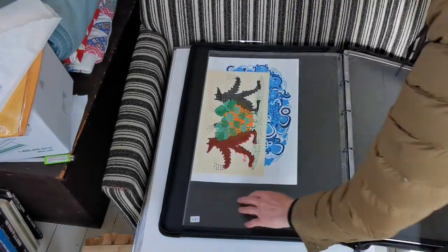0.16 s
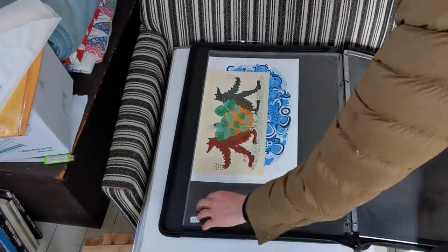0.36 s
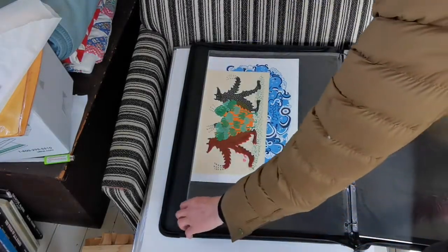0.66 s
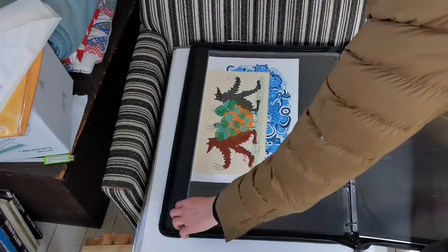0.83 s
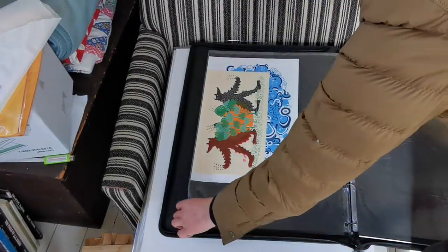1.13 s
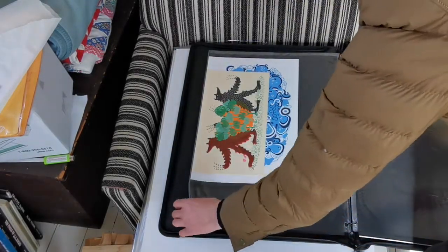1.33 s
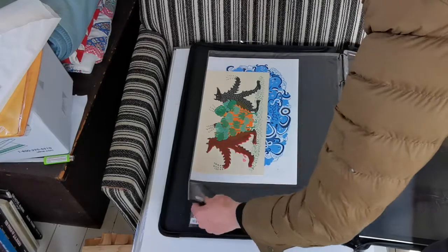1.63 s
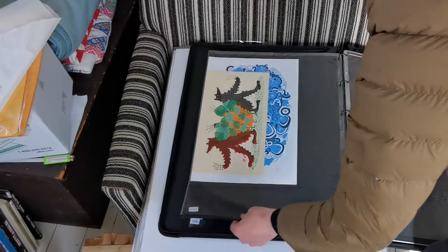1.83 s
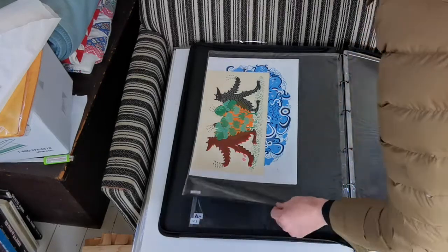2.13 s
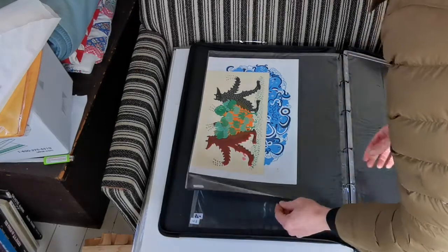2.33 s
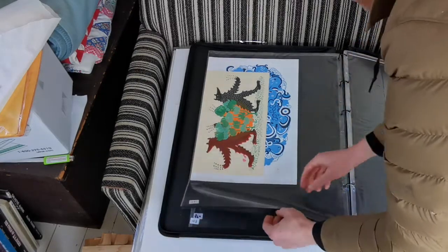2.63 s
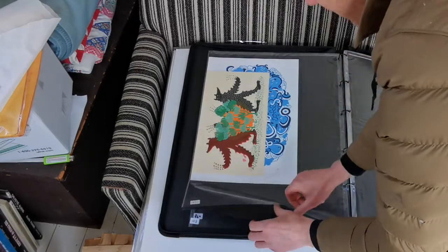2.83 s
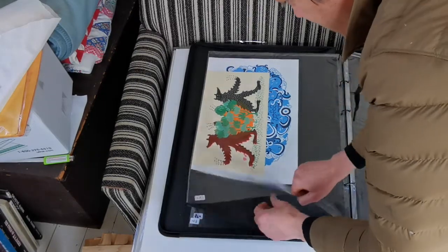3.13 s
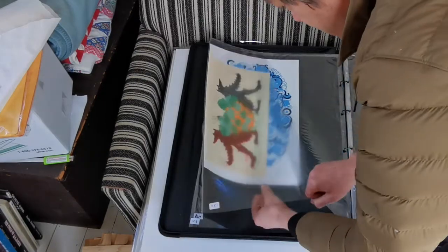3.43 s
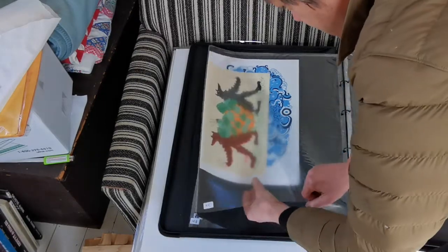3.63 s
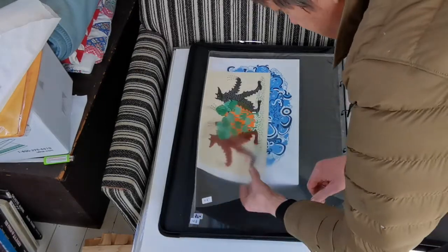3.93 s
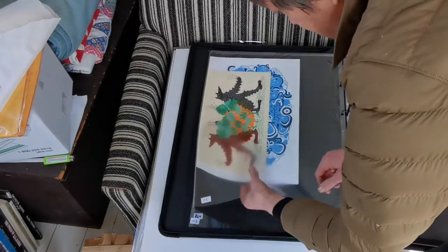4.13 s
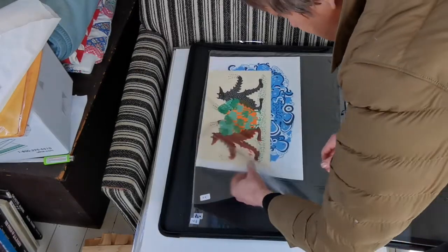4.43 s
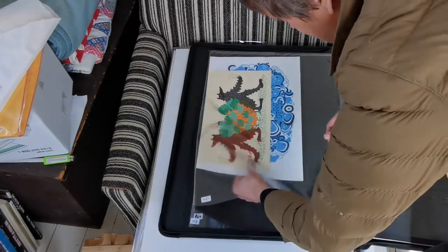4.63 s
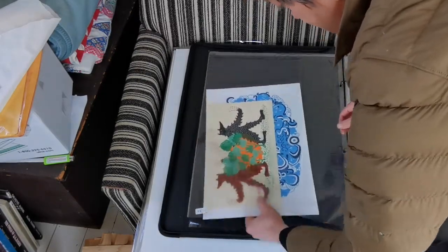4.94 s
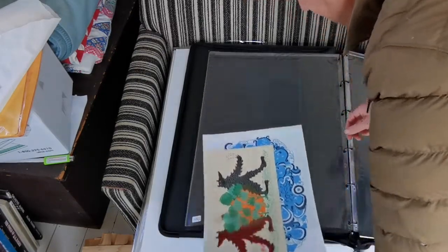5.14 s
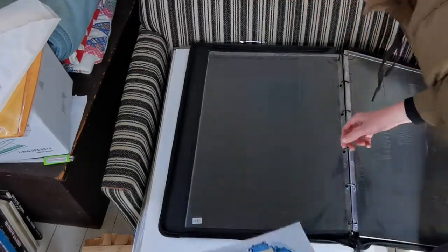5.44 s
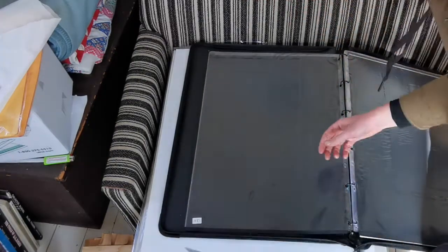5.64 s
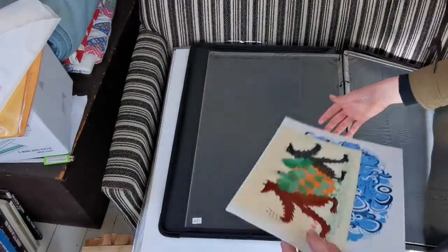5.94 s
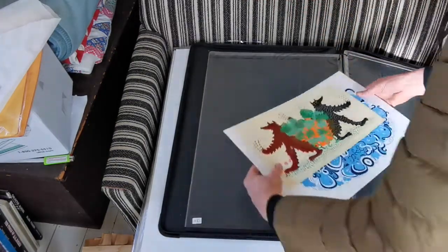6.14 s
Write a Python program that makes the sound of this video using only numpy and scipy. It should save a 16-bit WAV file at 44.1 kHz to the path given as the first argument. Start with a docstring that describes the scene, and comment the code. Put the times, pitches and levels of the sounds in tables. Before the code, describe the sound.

Close in a small furnished room, fingers and a jacket sleeve rub faintly over plastic film. Small crinkles and clicks build, then the stiff sleeve pops in a rapid burst of loud, bright clacks with a dull wobble and a brief binder ring. After lighter flaps and a lull, a print is drawn out with a steady hiss that drops in a quick swoop, leaving faint paper handling.

```python
"""Plastic sleeves and paper prints in a binder

A hand in a padded jacket picks at a clear plastic sleeve in a large binder in a small furnished room.
Its film buckles with sharp clacks (struck resonances) and wobbles (clumped noise); binder modes ring along.
Prints are drawn out with a hiss (coloured friction noise) that ends in a falling swoop (a gliding band-pass).
Synthetic echoes and still-room noise surround it all.
"""
import sys
import numpy as np
from scipy import signal
from scipy.fft import rfft, irfft, next_fast_len
from scipy.io import wavfile

SR = 44100
rng = np.random.default_rng(int(sys.argv[2]) if len(sys.argv) > 2 else 0)


def dump_mix(stems):
    """Bounce the given channels to the path in sys.argv[1] as a 16-bit WAV at rate SR."""
    frames = np.atleast_2d(stems).T  # one column per channel
    limited = np.clip(frames, -1, 1)  # hard clip at full scale
    pcm = np.round(limited * 32767).astype(np.int16)
    wavfile.write(sys.argv[1], SR, pcm)


N = 276948
TIME = np.arange(N) / SR

# dents in the film popping through: start_s [s], level_db [relative dB], pitch_hz [Hz], width_hz [Hz]
CLACK_EVENTS = [(0.8813, -30.5, 3470, 1990), (1.4226, -44, 1390, 615), (2.1124, -30.5, 3070, 5850),
                (2.1571, -30, 4750, 7000), (2.248, -24.5, 2760, 1310), (2.255, -25.5, 1220, 695),
                (3.168, -9.5, 2080, 2340), (3.181, -12.5, 5540, 5940), (3.189, -11.5, 2330, 2900),
                (3.2002, -16.5, 4450, 5000), (3.216, -12.5, 3040, 3300), (3.3183, -36, 1400, 1500),
                (3.3587, -28.5, 1670, 1870), (3.458, -27, 2270, 1400), (3.494, -25.5, 835, 470),
                (4.3499, -37.5, 825, 1200), (5.0097, -19.5, 3290, 1560), (5.649, -36.5, 304, 352),
                (6.1868, -43, 750, 700)]
# loose sheets slapping and fluttering on: start_s [s], level_db [relative dB], pitch_hz [Hz], width_hz [Hz]
FLAP_EVENTS = [(0.044, -49, 446, 900), (2.2485, -25.5, 920, 830), (2.258, -30.5, 1210, 890),
               (3.072, -33, 810, 910), (3.0736, -32.5, 1880, 448), (3.1854, -20.5, 980, 1500),
               (3.2305, -20, 1090, 1600), (3.3565, -31.5, 530, 500), (3.497, -37, 2750, 800),
               (3.648, -49.5, 690, 715), (3.7105, -29.5, 1490, 1910), (3.781, -25, 1110, 3620),
               (3.824, -38, 434, 800), (4.804, -34.5, 846, 1020), (5.0104, -31, 725, 567),
               (6.2445, -40, 1380, 2530)]
# dull bumps of the arm and of paper dropping free:
# start_s [s], level_db [relative dB], pitch_hz [Hz], width_hz [Hz]
BUMP_EVENTS = [(0.248, -49, 70, 71), (5.649, -45, 318, 150), (5.759, -56, 158, 60)]


def snaps(stop_cycles=1.5, stop_share=0.42, flutter_s=0.015, skirt=2.97, softness=1.25,
          thud_db=-19, thud_hz=520, crackle_db=4, count=4):
    """Snap-through buckling: a dent pops, stops and crackles on; one row for each place on the sheet."""
    out = np.zeros((count, N))
    t = TIME[:SR // 6]
    # each kind with the relative level of its after-crackle, dB
    kinds = (CLACK_EVENTS, -15), (FLAP_EVENTS, -9), (BUMP_EVENTS, -35)
    events = [(*row, flutter_db) for rows, flutter_db in kinds for row in rows]
    for k, (start_s, level_db, pitch_hz, width_hz, flutter_db) in enumerate(events):
        push = np.zeros(len(t))
        push[0] = 1
        stop_s = min(stop_cycles / pitch_hz, .02)
        push[int(stop_s * SR)] -= stop_share
        grains = from_db(crackle_db * drift(610, size=len(t)))
        crackle = rms_one(rng.standard_normal(len(t)) * grains)
        push += from_db(flutter_db) * np.sqrt(width_hz / SR) * crackle * np.exp(-t / flutter_s)
        pop = signal.lfilter(*resonance(pitch_hz, width_hz), push)
        pop = signal.lfilter(*resonance(pitch_hz, skirt * (pitch_hz + width_hz)), pop)
        # the whole sheet recoils
        thud = signal.lfilter(*resonance(min(pitch_hz, thud_hz), min(pitch_hz, 700)), push)
        snap = pop / np.abs(pop).max() + from_db(thud_db) * thud / np.abs(thud).max()
        # a narrow, low resonance is given little treble
        edge_hz = min(softness * (pitch_hz + width_hz), .4 * SR)
        snap = signal.lfilter(*signal.butter(2, edge_hz, fs=SR), snap)
        add(out[k % count], start_s, from_db(level_db) * snap)
    return out


# modes of the binder and its stack of sleeves: pitch_hz [Hz], width_hz [Hz], level_db [relative dB]
BINDER_MODES = [(137, 3.7, 3.5), (202.4, 5.5, 8), (243.6, 7.9, 9.5), (636, 18, 13), (793, 18, 7),
                (961, 26, 5), (1056, 6.7, 12), (1185, 52, 9), (1240, 27, -3), (2550, 300, -5),
                (3250, 70, -33)]


def binder(x, ring_db=-2):
    """Modal excitation: the moving film drives the binder's resonances."""
    driven = x + 1e-18   # tiny offset keeps the filters from slowing on vanishing numbers
    return sum(from_db(level_db + ring_db) * signal.lfilter(*resonance(pitch_hz, width_hz), driven)
               for pitch_hz, width_hz, level_db in BINDER_MODES)


def long_pull():
    """Sliding friction: as less paper is left, hiss and scrape strengths fade, and drone dies first."""
    start_s, rise_s, hold_s, release_s = 4.79, 0.048, 0.73, 0.22
    t = np.maximum(TIME - start_s, 0)
    hiss_db = -45.5 - 5 * t   # relative level and sag in dB per second
    scrape_db = -47.5 - 7.5 * t
    drone_db = -53.5 - 17 * t
    return from_db([hiss_db, scrape_db, drone_db]) * swell(start_s, rise_s, hold_s, release_s)


# hand and jacket sliding over the sleeve: start_s [s], rise_s [s], hold_s [s], release_s [s],
# hiss_db, scrape_db, drone_db [relative dB]
HAND_SLIDES = [(0.03, .25, 0.057, .4, -59.5, -59, -63.5), (0.72, 0.0071, 0.017, 0.11, -62, -69, -82),
               (0.82, 0.013, 0.021, 0.044, -70, -64.5, -64.5), (0.88, .005, 0.017, 0.034, -47, -51.5, -81),
               (1.02, 0.032, 0.018, 0.2, -59, -53, -61.5), (1.15, .04, 0.019, 0.04, -57.5, -57.5, -61.5),
               (1.40, 0.019, .16, 0.36, -61, -60.5, -65), (1.66, 0.2, 0.17, 0.75, -54.5, -57.5, -61.5),
               (2.2, 0.2, 0.22, 0.17, -59.5, -57, -57), (2.71, 0.031, 0.018, 0.076, -44.5, -44, -48.5),
               (2.85, .14, 0.018, 0.085, -62.5, -62, -53)]
# prints nudged inside the sleeve, later carried: start_s [s], rise_s [s], hold_s [s], release_s [s],
# hiss_db, scrape_db, drone_db [relative dB]
PRINT_NUDGES = [(3.86, 0.034, 0.15, 0.086, -84, -80, -67), (4.17, .015, 0.22, .1, -69, -70, -68.5),
                (4.3, .12, 0.025, 0.44, -57, -55, -53), (4.52, 0.11, 0.046, 0.059, -58.5, -58, -49),
                (5.87, 0.23, .08, .1, -71, -75.5, -66.5), (6.1, 0.11, 0.058, .1, -62.5, -60, -63)]


def slides(rows):
    """Kinematic friction: hiss, scrape and drone strengths all follow the speed; powers add."""
    power = 0
    for *timing, hiss_db, scrape_db, drone_db in rows:
        strength = from_db([hiss_db, scrape_db, drone_db])[:, None]
        power = power + (strength * swell(*timing)) ** 2
    return np.sqrt(power)


# spectrum of the fine hiss: frequency_hz [Hz], level_db [relative dB]
HISS_COLOUR = [(2000, -28), (3800, -24), (5500, 2), (7000, 2.5), (9000, -4.5), (15000, -3)]
# spectrum of the coarse scrape: frequency_hz [Hz], level_db [relative dB]
SCRAPE_COLOUR = [(800, -38), (1500, -10), (2300, -3.5), (3400, -1.5), (4800, -4.5), (8000, -13)]
# spectrum of the sheet drone: frequency_hz [Hz], level_db [relative dB]
DRONE_COLOUR = [(100, -14), (250, -12), (450, -5), (750, -2), (1200, -0.5), (1800, -5), (3500, -22.5)]


def rubbing(strengths, hiss_db, scrape_db, drone_db, grain_db):
    """Friction noise: sliding surfaces hiss, scrape and set the broad sheets droning."""
    out = 0
    colours = HISS_COLOUR, SCRAPE_COLOUR, DRONE_COLOUR
    for colour, strength, trim_db in zip(colours, strengths, (hiss_db, scrape_db, drone_db)):
        waver_db = 1.02 * drift(25)   # sliding is never quite even
        out = out + strength * from_db(trim_db + waver_db) * coloured(friction(grain_db), colour)
    return out


# air through the gap, a thin stream, then the rush as the paper leaves:
# start_s [s], rise_s [s], hold_s [s], release_s [s], level_db [relative dB]
AIR_FLOWS = [(5.215, 0.066, .3, .08, -57), (5.5, 0.052, .1, 0.11, -48)]


def swoop(width_share=0.3, level_db=-1.5, lowest_hz=210, rough_db=1.6, flutters_per_s=120, size=64):
    """Cavity resonance: the gap sings at one pitch, then falls ever faster to a floor as it widens."""
    gap_hz, opens_s, fall_octaves_per_s2 = 2520, 5.41, 41
    fall_octaves = fall_octaves_per_s2 * np.maximum(TIME - opens_s, 0) ** 2
    hz = np.maximum(gap_hz * 2 ** -fall_octaves, lowest_hz)
    flow = np.max([from_db(db) * swell(*timing) for *timing, db in AIR_FLOWS], axis=0)
    slips = rms_one(friction(rough_db, flutters_per_s)[0])
    out, state = np.zeros(N), np.zeros(2)
    # retune every block, carrying the filter state over
    for i in range(int(AIR_FLOWS[0][0] * SR), N, size):
        gap = resonance(hz[i], width_share * hz[i])
        out[i:i + size], state = signal.lfilter(*gap, slips[i:i + size], zi=state)
    even_power = np.sqrt(SR / (np.pi * width_share * hz))   # offsets the narrowing band
    return out * even_power * flow * from_db(level_db)


# fingers dragging over the film: start_s [s], length_s [s], level_db [relative dB], pitch_hz [Hz]
FINGER_STROKES = [(0.718, 0.047, -59.5, 2700), (0.875, 0.011, -50.5, 2780), (1.032, 0.077, -55.5, 1940),
                  (1.088, 0.19, -63.5, 1690), (1.157, 0.071, -55.5, 3600), (1.413, 0.057, -55, 1330),
                  (1.531, 0.13, -62.5, 1870), (2.157, 0.045, -46.5, 5700), (2.434, 0.078, -47.5, 6160),
                  (2.516, 0.023, -50.5, 1100), (2.565, 0.07, -52, 5570), (2.733, 0.082, -50, 1200),
                  (2.958, 0.065, -60, 1440)]


def strokes(grain_db=4, level_db=-4.0, width_share=0.52):
    """Stick-slip: a fingertip grips and slips, ringing the stretch of film under it."""
    out = np.zeros(N)
    t = TIME[:SR // 4]
    for start_s, length_s, stroke_db, pitch_hz in FINGER_STROKES:
        slips = rng.standard_normal(len(t)) * from_db(grain_db * drift(702, size=len(t)))
        grip = np.sin(np.pi * np.clip(t / length_s, 0, 1))
        film = resonance(pitch_hz, width_share * pitch_hz)
        ring = rms_one(signal.lfilter(*film, signal.lfilter(*film, slips)))   # filtered twice
        add(out, start_s, from_db(stroke_db + level_db) * grip * ring)
    return out


# swings of the lifted sleeve: start_s [s], level_db [relative dB]
SLEEVE_SWINGS = [(3.072, -44), (3.18, -41), (3.31, -44), (3.37, -46), (3.478, -44), (3.78, -52.5)]
# spectrum of the wobble: frequency_hz [Hz], level_db [relative dB]
FLEX_COLOUR = [(50, -11.5), (130, -6), (220, -6), (450, 0.5), (900, -4.5), (1600, -6.5), (3000, -17),
               (7000, -25.5)]


def wobble(flap_db=4, flaps_per_s=70, level_db=-6):
    """Plate flexure: with each swing the loose sleeve flexes in quick, dull, irregular flaps."""
    rise_s, hold_s, release_s = 0.0067, 0.042, 0.11
    swings = [from_db(db) * swell(s, rise_s, hold_s, release_s) for s, db in SLEEVE_SWINGS]
    motion = np.max(swings, axis=0)
    return from_db(level_db) * motion * coloured(friction(flap_db, flaps_per_s), FLEX_COLOUR)


def room(x, echoes, direct_db, wet_db, lean_db=2.4):
    """Superposition: direct sound, a sample early and weaker on the right, plus its echoes."""
    sides_db = direct_db + np.array([[1], [-1]]) * lean_db / 2
    direct = np.array([np.roll(x, 1), x]) * from_db(sides_db)
    return direct + from_db(wet_db) * signal.fftconvolve(x[None], echoes, axes=1)[:, :N]


# reverberation times: frequency_hz [Hz], t60_s [s]
TAIL_T60 = [(150, 0.11), (400, 0.45), (1000, 0.26), (2800, 0.34), (7300, 0.36)]
# spectrum of the echoes: frequency_hz [Hz], level_db [relative dB]
ECHO_COLOUR = [(80, 20), (150, 16), (230, -7), (400, 5.5), (640, 4.5), (850, 4.5), (1200, 6), (3000, 1.5),
               (4300, -3.5), (7000, 0.5), (14000, 3)]


def reflections(first_s=0.0031):
    """Exponential decay: dense echoes from close walls, each band with its own T60; unit energy."""
    t = np.arange(SR // 2) / SR
    hz = np.fft.rfftfreq(len(t), 1 / SR)
    noise = rfft(coloured(rng.standard_normal((2, len(t))), ECHO_COLOUR))
    centres_hz = np.array(TAIL_T60)[:, 0]
    tail = 0
    # the bands overlap as triangles that sum to one
    for (_, t60_s), share in zip(TAIL_T60, np.eye(len(TAIL_T60))):
        band = at_hz(np.column_stack([centres_hz, share]), hz)
        tail = tail + irfft(noise * band, len(t)) * from_db(-60 * t / t60_s)
    onset = np.clip(2 * t / first_s - 1, 0, 1)
    return rms_one(tail * onset) / np.sqrt(len(t))


# spectrum of the still room: frequency_hz [Hz], level_db [relative dB]
AIR_COLOUR = [(20, 16), (45, 6), (100, 6), (145, 9), (180, 4.5), (300, 1.5), (700, -3.5), (2000, -3),
              (7000, -5), (15000, -12.5)]


def still_air(level_db=-63):
    """Stationary noise: the steady background of the room."""
    return from_db(level_db) * coloured(rng.standard_normal((2, N)), AIR_COLOUR)


# likeness of the channels: frequency_hz [Hz], correlation [-1 to 1]
CHANNEL_LIKENESS = [(30, 0.41), (150, 0.45), (500, 0.85), (1000, 0.75), (2000, 0.59), (4000, 0.029),
                    (12000, 0.015)]
# lean to the left: frequency_hz [Hz], left_minus_right_db [dB]
LEFT_LEAN = [(100, 0.5), (1000, 0.5), (2200, 0.5), (4500, -2.5), (12000, -1.5)]


def coloured(x, spectrum):
    """Interchannel coherence: give a noise pair a spectrum and stereo image; joint rms 1."""
    length = x.shape[1]
    size = next_fast_len(length, True)
    hz = np.fft.rfftfreq(size, 1 / SR)
    grid = np.geomspace(10, SR / 2, 200)
    alike = np.clip(np.interp(hz, grid, at_hz(CHANNEL_LIKENESS, grid)), -.99, .99)
    mid, side = rfft(x, size)
    pair = []
    for sign in (1, -1):   # left, right
        gain = from_db(at_hz(spectrum, grid) + sign * at_hz(LEFT_LEAN, grid) / 2)
        mixed = np.sqrt(1 + alike) * mid + sign * np.sqrt(1 - alike) * side
        pair.append(np.interp(hz, grid, gain) * mixed)
    return rms_one(irfft(np.array(pair), size)[:, :length])


def friction(grain_db, per_s=700):
    """Stochastic friction: countless tiny slips, in clumps of uneven strength."""
    return rng.standard_normal((2, N)) * from_db(grain_db * drift(per_s))


def swell(start_s, rise_s, hold_s, release_s):
    """Movement envelope: speed builds evenly, holds, then loses 20 dB per release time."""
    t = TIME - start_s
    decay_db = -20 * np.clip((t - rise_s - hold_s) / release_s, 0, 10)
    return np.clip(t / rise_s, 0, 1) * from_db(decay_db)


def resonance(hz, width_hz):
    """Damped oscillator: two-pole band-pass coefficients."""
    w = 2 * np.pi * min(hz, SR / 3) / SR
    damping = np.sin(w) * width_hz / hz / 2
    b = np.array([damping, 0, -damping])
    a = np.array([1 + damping, -2 * np.cos(w), 1 - damping])
    return b / (1 + damping), a / (1 + damping)


def drift(rate, size=N):
    """Random modulation: chance values, rate per second, joined by lines; rms 1."""
    knots = rng.standard_normal(size // 16)
    return rms_one(np.interp(TIME[:size] * rate, np.arange(len(knots)), knots))


def at_hz(points, hz):
    """Logarithmic frequency scale: interpolate a table on it."""
    f, value = np.transpose(points)
    return np.interp(np.log(np.maximum(hz, 1)), np.log(f), value)


def rms_one(x):
    """Normalisation: scale to unit power."""
    return x / np.sqrt(np.mean(x ** 2) + 1e-20)


def from_db(db):
    """Decibel law: level to amplitude gain."""
    return 10 ** (np.asarray(db) / 20)


def add(out, start_s, sound):
    """Superposition: mix a short sound in at a time."""
    at = int(round(start_s * SR))
    out[at:at + len(sound)] += sound[:N - at]


def scene():
    """Superposition of sources: each place on the binder has its own echoes, over the still room."""
    places = snaps()
    flaps = sum(room(place, reflections(), direct_db=0.0, wet_db=1.5) for place in places)
    flex = wobble()
    ring = binder(places.sum(axis=0) + flex[0])
    reach = rubbing(slides(HAND_SLIDES), hiss_db=5.5, scrape_db=1.5, drone_db=-2.5, grain_db=1.5)
    pull_strengths = slides(PRINT_NUDGES) + long_pull()
    pull = rubbing(pull_strengths, hiss_db=6.5, scrape_db=3.5, drone_db=-1, grain_db=1.0)
    rubs = reach + pull   # spread over a wide area, so the channels differ even without echoes
    rub_room = room(rubs[0], reflections(), direct_db=-16.5, wet_db=-6.5)
    echoes = reflections()
    gap = room(swoop(), echoes, direct_db=3.0, wet_db=-9.5)
    fingers = room(strokes(), echoes, direct_db=2.5, wet_db=3.5)
    handling = flaps + from_db(1.5) * flex + ring + fingers + gap
    return handling + from_db(-2.5) * rubs + rub_room + still_air()


def record(dry, knee_hz=7700, top_db=-19, ceiling=0.78, cutoff_hz=15150):
    """Transducer response: peaks are rounded, high treble steps down and the very top is cut."""
    dry = ceiling * np.tanh(dry / ceiling)
    body = signal.sosfilt(signal.butter(10, knee_hz, fs=SR, output="sos"), dry)
    top = signal.sosfilt(signal.butter(4, knee_hz, "high", fs=SR, output="sos"), dry)
    cut = signal.ellip(10, .2, 70, cutoff_hz, fs=SR, output="sos")
    return signal.sosfilt(cut, body + from_db(top_db) * top)


dry = scene()
out = record(dry)
dump_mix(out)
```